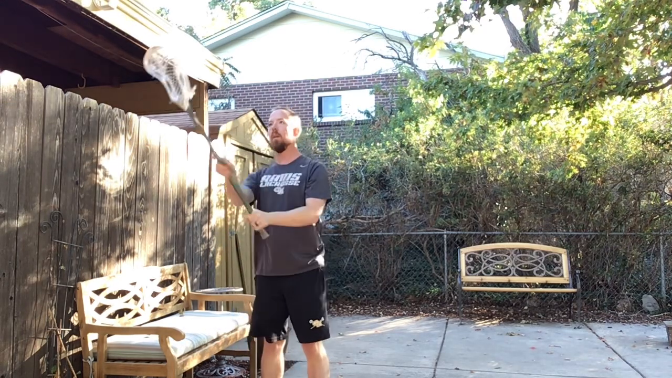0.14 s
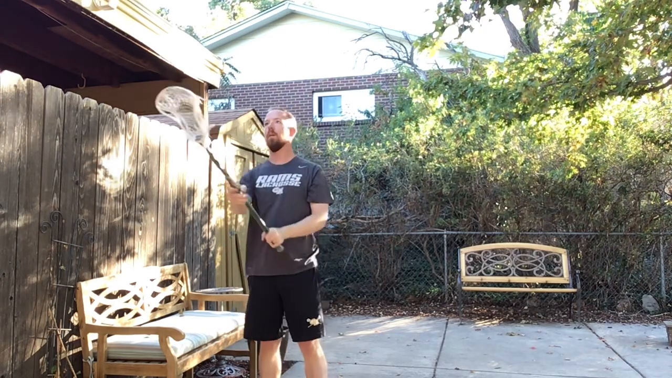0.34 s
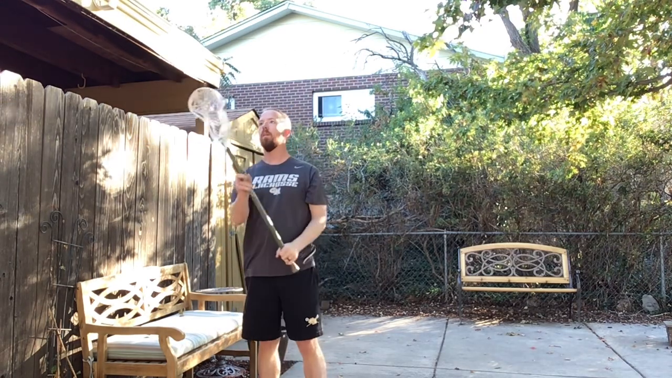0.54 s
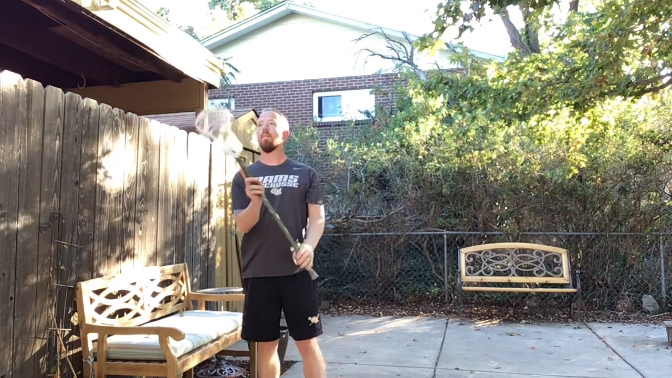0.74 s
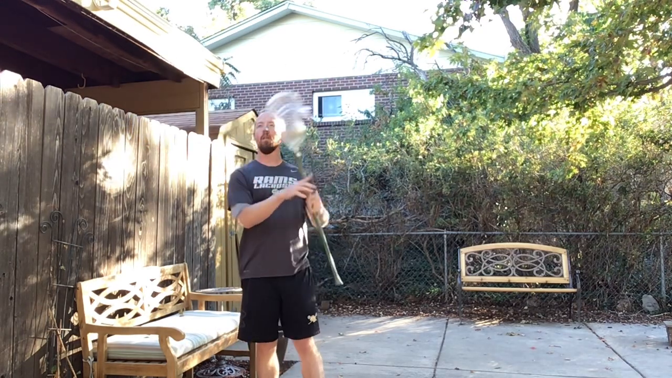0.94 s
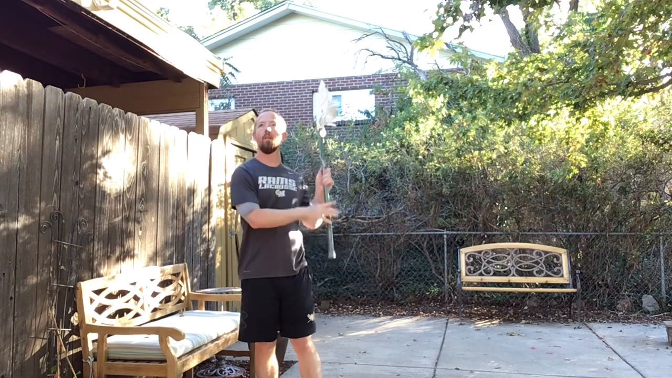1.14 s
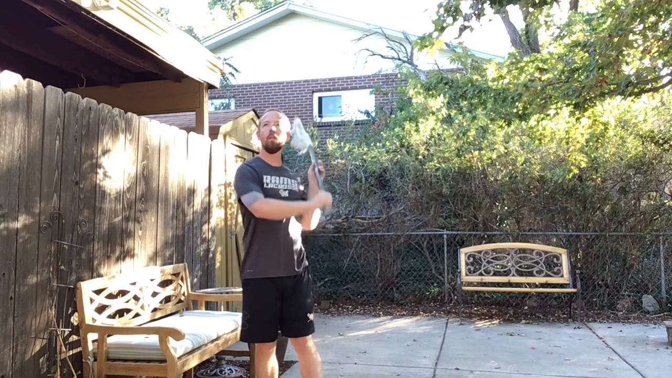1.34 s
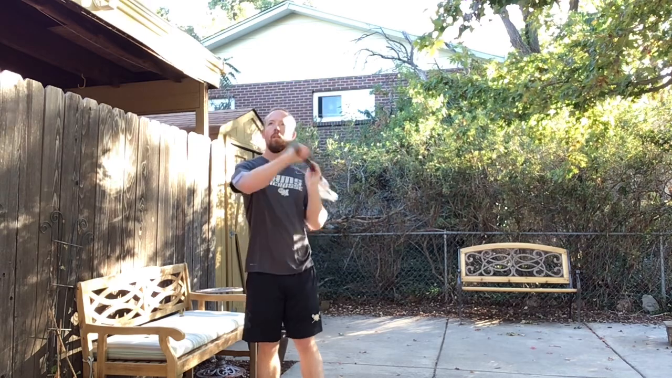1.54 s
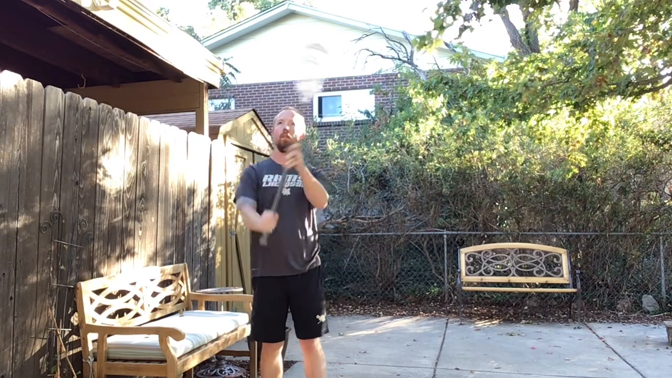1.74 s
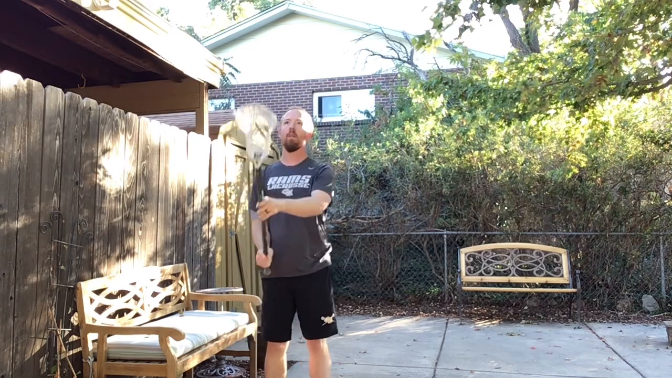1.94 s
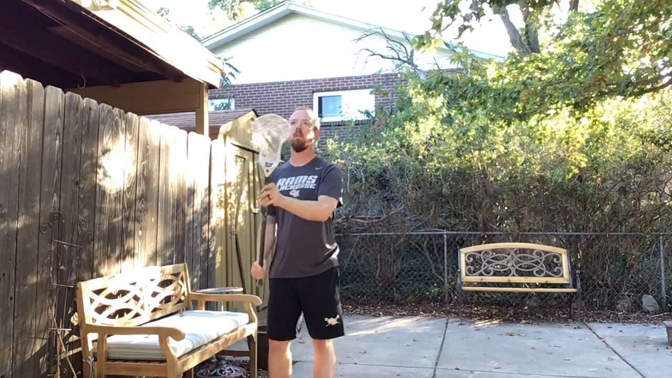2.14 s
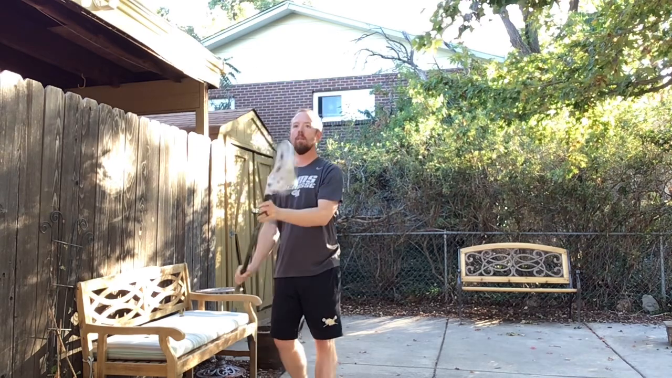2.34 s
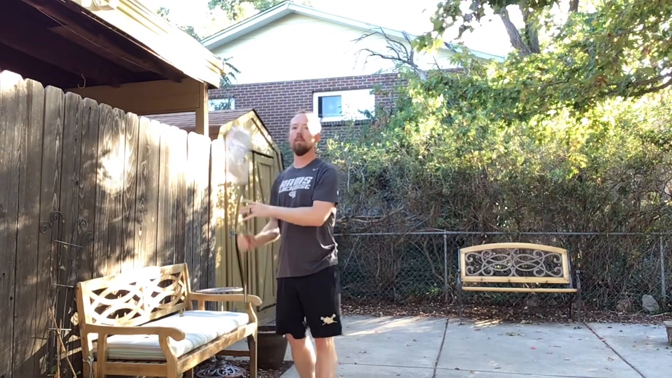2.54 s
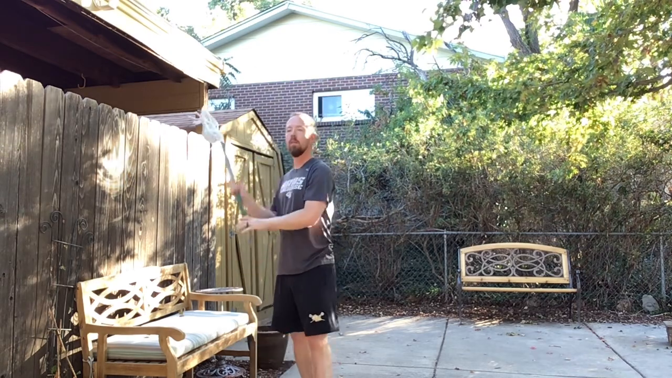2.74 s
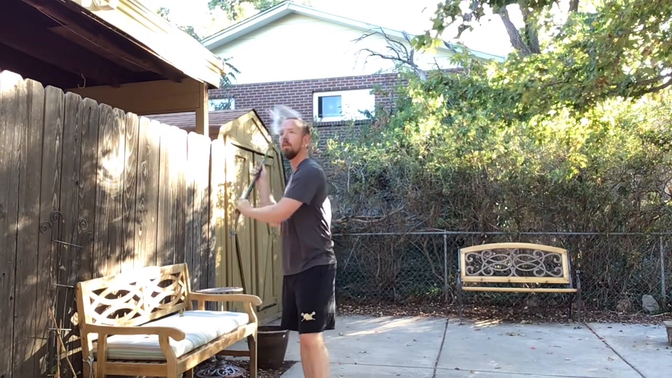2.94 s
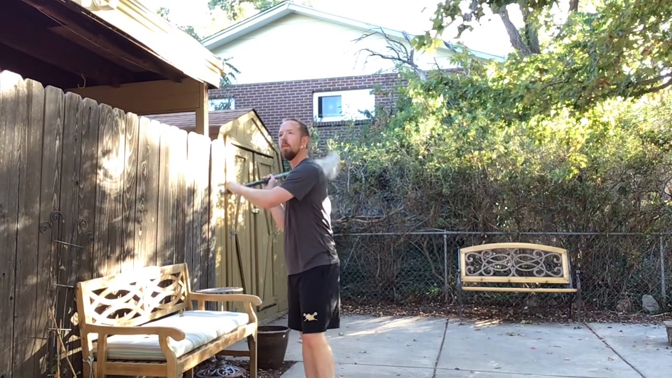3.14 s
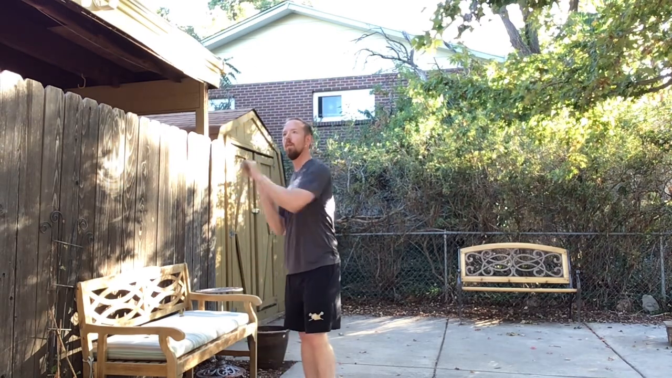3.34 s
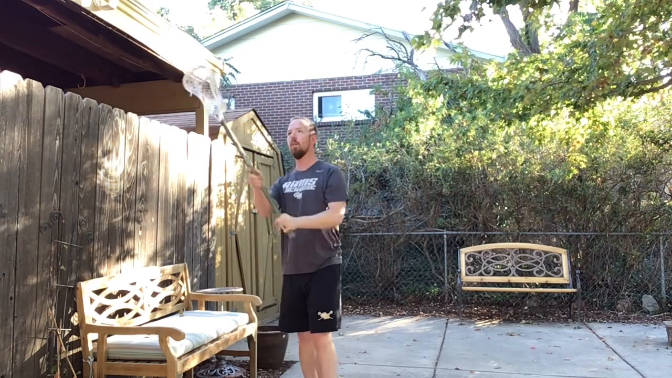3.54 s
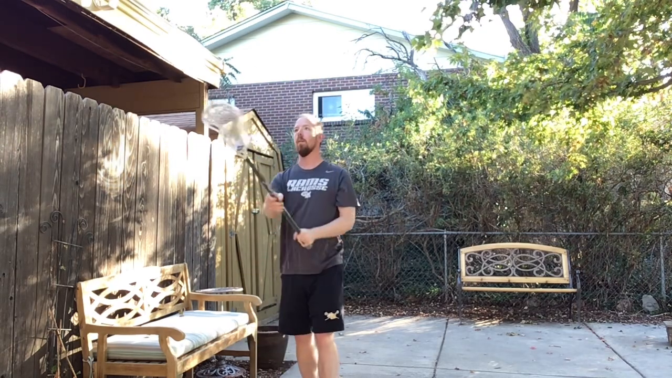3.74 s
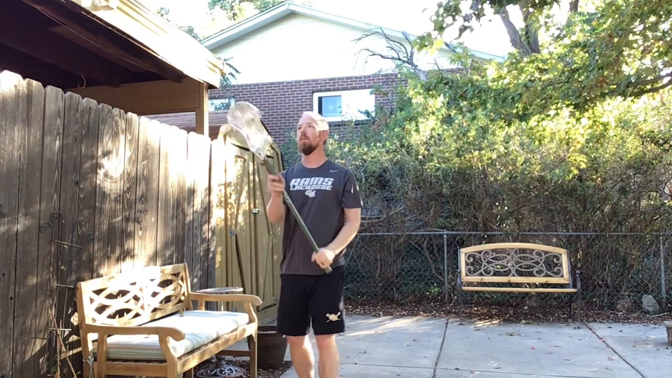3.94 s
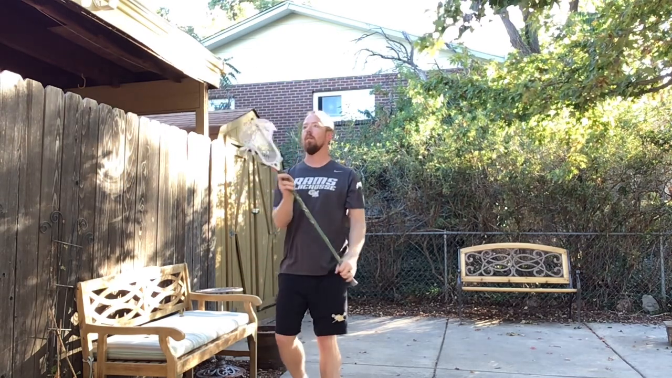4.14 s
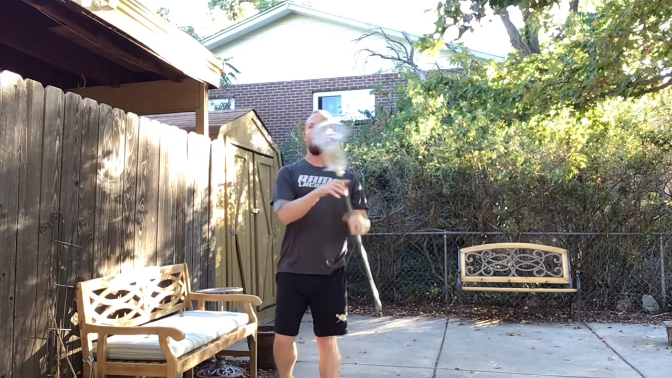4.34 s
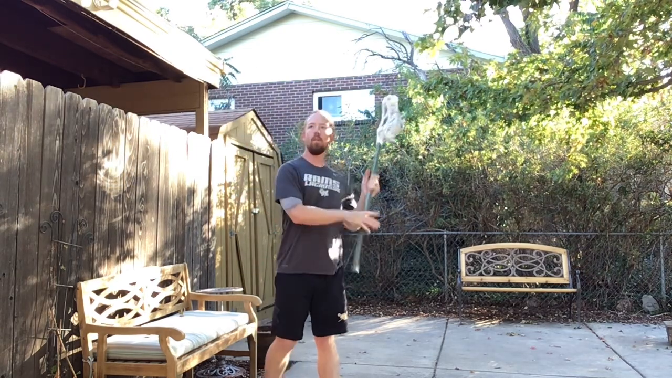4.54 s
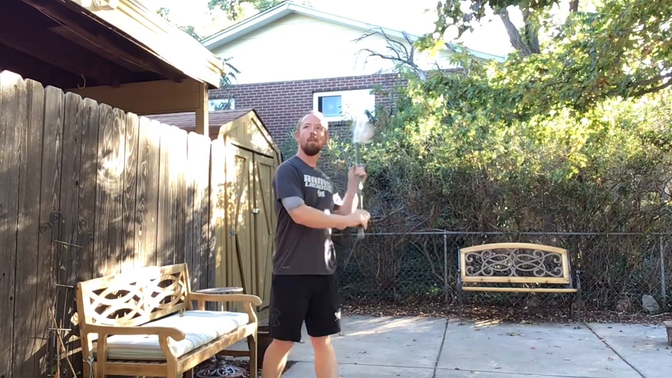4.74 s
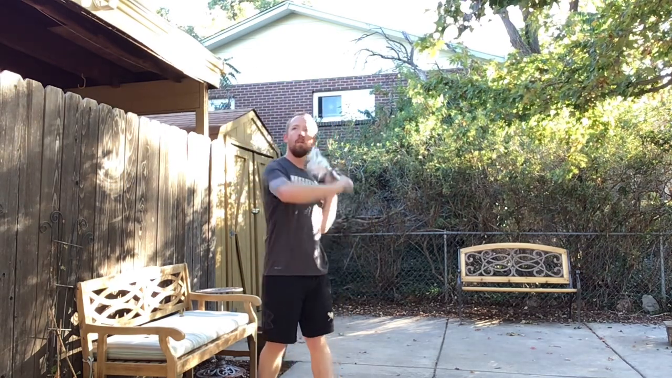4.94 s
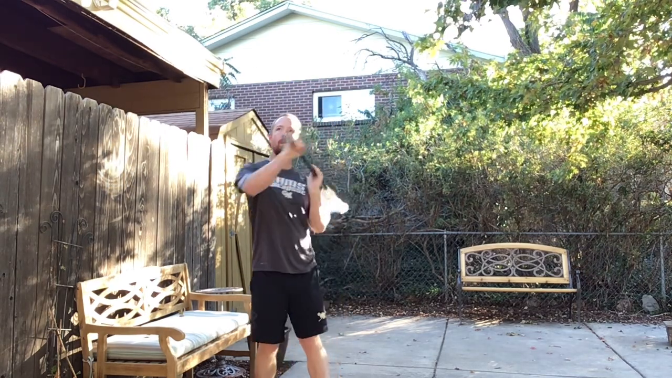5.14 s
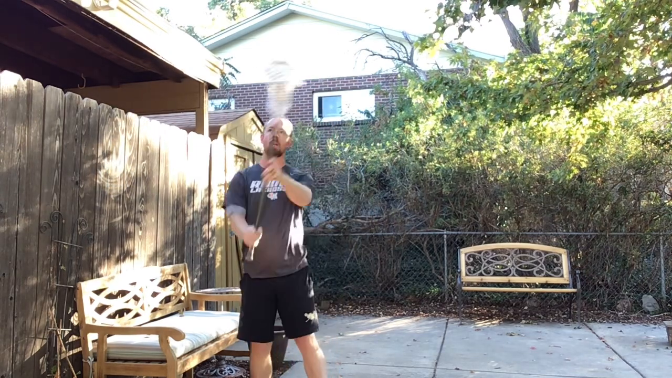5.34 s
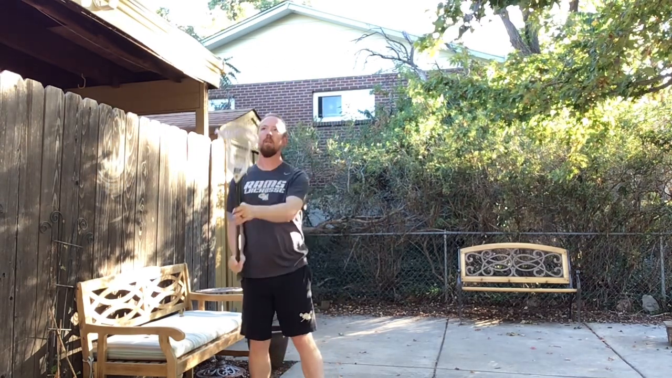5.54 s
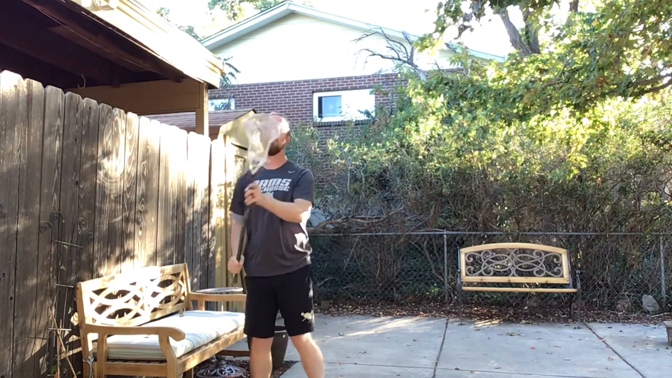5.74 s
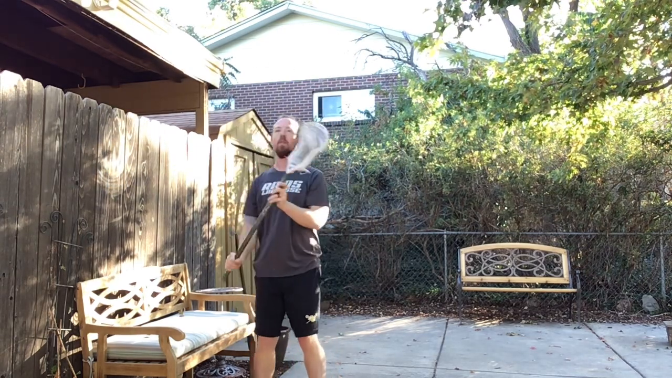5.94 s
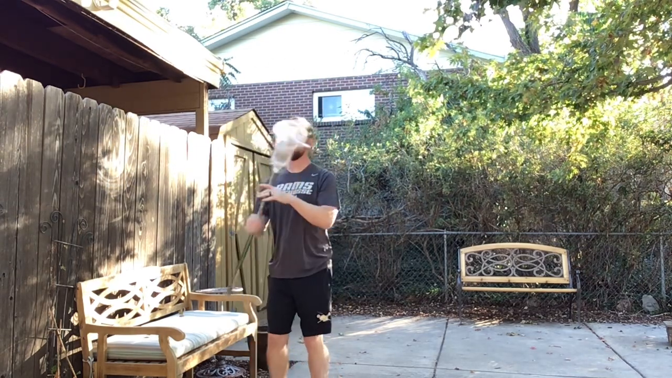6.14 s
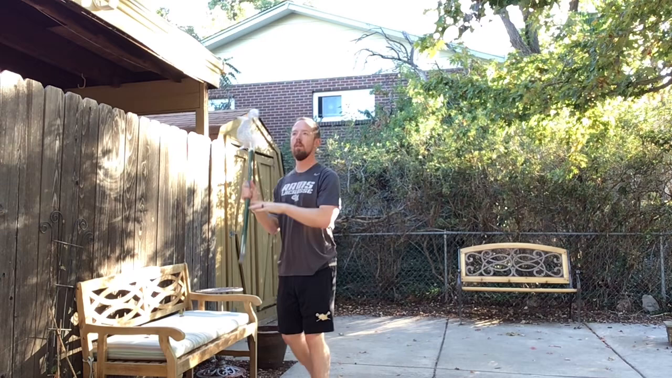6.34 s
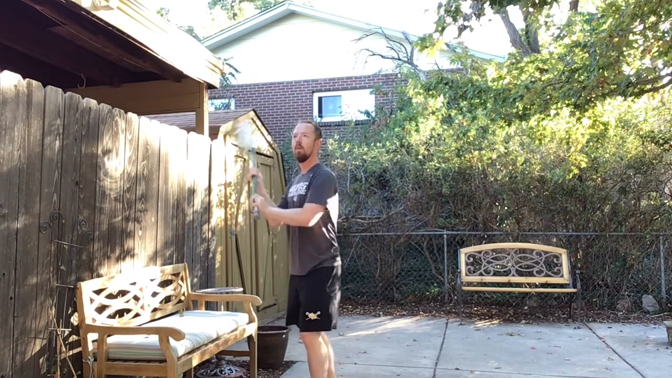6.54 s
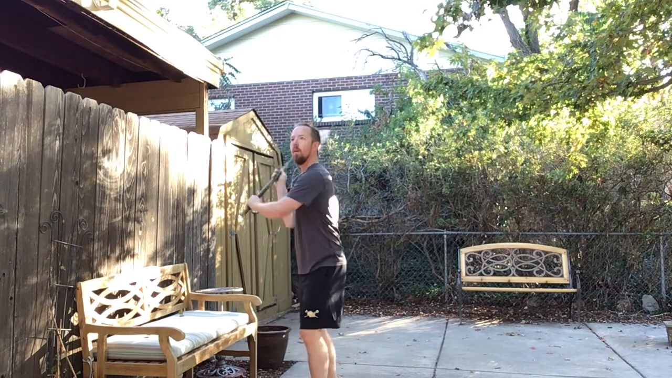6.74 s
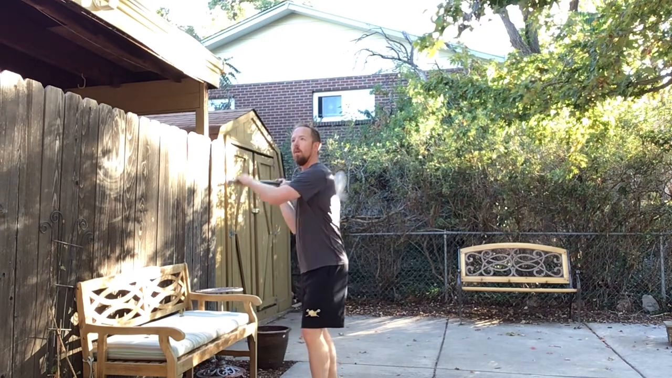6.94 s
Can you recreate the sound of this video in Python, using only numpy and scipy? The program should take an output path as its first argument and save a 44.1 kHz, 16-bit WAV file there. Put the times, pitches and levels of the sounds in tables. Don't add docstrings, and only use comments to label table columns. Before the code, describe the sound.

A fenced patio with hard slab and walls, heard from a few steps away. A low town hum and a distant propeller drone, wavering and sinking slightly in pitch, run throughout. At 0.4 s a rubber ball hits a sprung net: bright slap, low thump, quick reflections and a short low tail. At 0.74 s it crunches softly into a mesh pocket, with light grip contacts around 1.0 and 1.4 s. A second hit at 2.0 s has a slightly different thump, its catch at 2.36 s the clearest. The third hit comes at 3.8 s, caught at 4.2 s, with a small contact at 4.5 s. The fourth hits at 5.6 s, caught at 5.98 s, as a faint far bird twitters falling notes until 6.2 s. From 6.55 to 6.75 s a shoe scrapes and crackles on grit; then only the drone and hum remain.

```python
import sys
import numpy as np
from scipy import signal
from scipy.fft import rfft, irfft
from scipy.io import wavfile

SR = 44100
rng = np.random.default_rng(int(sys.argv[2]) if len(sys.argv) > 2 else 0)


def unload_wav(signal):
    wavfile.write(
        sys.argv[1],
        SR,
        np.round(np.clip(np.atleast_2d(signal).T, -1, 1) * 32767).astype(np.int16),
    )


def linear_from_db(decibels):
    return 10 ** (np.asarray(decibels, float) / 20)


N = 313110

# (time [s], slap peak [dB], thump level [dB], thump lag [ms], shiver of the cords [Hz])
NET_HITS = [
    (.387, -29.5, -22.5, 4.6, 7300),
    (2.0367, -28, -19, 4.3, 9600),
    (3.8243, -26, -21.5, 5.0, 10100),
    (5.6176, -28.5, -18, 2.63, 9600),
]


def rms_one(x):
    return x / np.sqrt(np.mean(x ** 2) + 1e-20)


def at_hz(points, hz, column=1):
    points = np.array(points)
    return np.interp(np.log(hz), np.log(points[:, 0]), points[:, column])


def drift(rate):
    pole = np.exp(-80 * np.pi * rate / SR)
    noise = rng.standard_normal(N // 40 + 2002)
    slow = signal.lfilter([1], [1, -2 * pole, pole * pole], noise)[2000:]
    return np.interp(np.arange(N) / 40, np.arange(len(slow)), rms_one(slow))


def ring(clicks, hz, t60):
    radius = linear_from_db(-60 / (t60 * SR))
    angle = 2 * np.pi * hz / SR
    poles = [1, -2 * radius * np.cos(angle), radius * radius]
    return signal.lfilter([0, np.sin(angle)], poles, clicks + 1e-18)


def colour(x, spectrum):
    size = 8192
    hz = np.maximum(np.arange(size // 2 + 1) * SR / size, 1)
    cepstrum = irfft(np.log(linear_from_db(at_hz(spectrum, hz))))
    cepstrum[1:size // 2] *= 2
    cepstrum[size // 2 + 1:] = 0
    impulse = irfft(np.exp(rfft(cepstrum)))
    return signal.fftconvolve(x, impulse)[:len(x)]


def dying(t60, rise_s, size):
    t = np.arange(size) / SR
    return (1 - np.exp(-t / rise_s)) * linear_from_db(-60 * t / t60)


def pressed(press_s, t60, size):
    t = np.arange(size) / SR
    released_db = -60 * np.maximum(t - press_s, 0) / t60 - 5.0 * (t > press_s)
    return (1 - np.exp(-t / 0.00043)) * linear_from_db(released_db)


def grains(size, per_s, spread_db):
    sizes = linear_from_db(spread_db * np.minimum(rng.exponential(1, size), 4)) * rng.standard_normal(size)
    return rms_one(sizes * (rng.random(size) < per_s / SR))


def add(track, s, sound):
    i = round(s * SR)
    track[i:i + len(sound)] += sound[:N - i]


def slap():
    # (delay [ms], level [dB])
    echoes = [(0, 0), (1.8, -8), (3.4, -8), (5.6, -12), (8.5, -14)]
    # (frequency [Hz], left [dB per Hz], right [dB per Hz])
    slap_colour = [(402, 24, 11), (1000, -1, -17.5), (1780, 3, -7), (2700, 4.5, 2), (3880, 2, -4),
                   (5500, 4, -5), (7060, 7, -3.5), (10900, 5.5, 3.5), (13500, 1.5, -1), (16100, -3, 4)]
    # (frequency [Hz], level against the thump [dB], t60 [s])
    steel_frame = [(520, -28, 0.083), (627, -37, 0.24), (750, -29, 0.019)]
    tail_db, tail_t60_s, frame_lag_s = -54.5, 0.2, 0.00174
    out, size = np.zeros(N), SR // 3
    for turn, (s, peak_db, thump_db, _, shiver_hz) in enumerate(NET_HITS):
        sound = linear_from_db(tail_db) * grains(size, 20000, spread_db=-1.5) * dying(tail_t60_s, 0.0012, size)
        for ms, level_db in echoes:
            click = rng.standard_normal(size=90) * dying(.0018, .0001, size=90)
            click = signal.lfilter([1, -.7 * (ms > 1)], [1], click)
            add(sound, ms / 1000, linear_from_db(peak_db + level_db) * click / np.abs(click).max())
        sound += 0.05 * ring(sound, shiver_hz, 0.003)
        add(out, s, colour(sound, np.array(slap_colour)[:, [0, 1 + turn % 2]]))
        for hz, level_db, t60 in steel_frame:
            clank_db = thump_db + level_db + rng.normal(0, 1)
            add(out, s + frame_lag_s, linear_from_db(clank_db) * ring(np.arange(size) == 0, hz, t60))
    return linear_from_db(2.0) * out


def thump():
    # (frequency [Hz], level [dB], t60 [s])
    left_modes = [(155.8, 4, 0.11), (210.9, 10, 0.023), (210, 0.6, .12), (267, 1.4, 0.1), (327, 0.7, 0.052),
                  (404, -16, .05)]
    # (frequency [Hz], level [dB], t60 [s])
    right_modes = [(144.4, -7, 0.105), (174.2, -3, .12), (199.4, 0.4, 0.052), (241.3, -1, 0.061),
                   (321.6, -6, 0.1), (378.4, -11, 0.088)]
    # (extra path [m], left hit [dB], right hit [dB])
    walls = [
        (0, 0, 0),
        (3.07, -6, -3.7),
        (7.83, -30, 0),
        (10.72, -14.5, -29),
        (20.69, -11.5, -9.5),
        (27.56, -30, -14),
        (30.57, -19, -30),
    ]
    contact_s = (.0019, .0028)
    sound_m_per_s = 343
    out, size = np.zeros(N), SR // 3
    for turn, (s, _, level_db, lag_ms, _) in enumerate(NET_HITS):
        side = turn % 2
        push = np.hanning(round(contact_s[side] * SR))
        push = np.pad(push / push.sum(), (0, size))
        swing = np.zeros(len(push))
        for k, (hz, db, t60) in enumerate((left_modes, right_modes)[side]):
            swing += (-1) ** k * linear_from_db(db) * ring(push, hz, t60)
        for path_m, *loss_db in walls:
            arrival_s = s + lag_ms / 1000 + path_m / sound_m_per_s
            add(out, arrival_s, linear_from_db(level_db + loss_db[side]) * swing)
    return out


def yard():
    # (frequency [Hz], level [dB per Hz], t60 [s])
    reverberation = [(60.6, -42, 0.61), (122, -32.5, 0.18), (214, -48, 0.69), (287, -55, 0.48),
                     (400, -53, 0.34), (620, -58, 0.24), (900, -67.5, 0.23), (1500, -64.5, 0.063)]
    out, size = np.zeros(N), SR
    edges = 45 * 2 ** np.arange(0, 5.6, .5)
    for s, _, level_db, *_ in NET_HITS:
        for low, high in zip(edges, edges[1:]):
            hz = np.sqrt(low * high)
            sos = signal.butter(2, [low, high], "band", fs=SR, output="sos")
            band = signal.sosfilt(sos, rng.standard_normal(size))
            tail = band * dying(at_hz(reverberation, hz, column=2), 11.0 / hz, size)
            add(out, s, linear_from_db(level_db + at_hz(reverberation, hz) + 49.5) * tail)
    return out


def catches():
    # (time [s], level [dB], press [s], t60 [s], ring of the head [Hz])
    drops = [
        (0.742, -57.5, 0.015, 0.25, 2240),
        (2.355, -48.5, 0.0087, 0.073, 3030),
        (2.371, -57, 0.02, 0.2, 2700),
        (4.175, -57, 0.0106, 0.11, 3220),
        (5.979, -59, 0.0053, 0.33, 7500),
    ]
    # (frequency [Hz], level [dB per Hz])
    pocket = [(200, 5.5), (500, 4), (1000, -2), (1800, -5.5), (2700, -1.5), (3800, -1.5), (5500, -7),
              (7700, -7), (10500, -12.5), (15000, -19)]
    out, size = np.zeros(N), SR // 4
    for s, level_db, press_s, t60, head_hz in drops:
        crunch = rms_one(colour(grains(size, 15000, spread_db=4.0), pocket)) * pressed(press_s, t60, size)
        head = 75 / head_hz * ring(crunch, head_hz, .02)
        add(out, s, linear_from_db(level_db) * (crunch + head))
    return out


def grips():
    # (time [s], level [dB], low edge [Hz], slope above it [dB per octave], t60 [s])
    contacts = [(.743, -57.5, 1500, -11, 0.067), (4.179, -57.5, 1000, -13.5, .07),
                (1.007, -55.5, 2700, -4.5, 0.084), (1.031, -58, 2010, -7, 0.12),
                (1.031, -56.5, 5500, -15, 0.11), (1.411, -56.5, 2700, -3, 0.14),
                (2.669, -69.5, 3000, -2, 0.33), (2.773, -70, 2800, -4, .08), (4.501, -57, 2420, -4, 0.035),
                (4.510, -59.5, 2520, -1, 0.12), (5.319, -58.5, 3020, -10, 0.089),
                (5.6172, -41, 8000, 5, .004), (6.013, -59.5, 4150, -8, 0.086),
                (6.08, -63.5, 3500, -8, 0.073), (6.093, -64.5, 4240, -11, 0.22),
                (6.35, -68.5, 7500, -7, 0.49)]
    press_share = 0.065
    out, size = np.zeros(N), SR // 4
    for s, level_db, edge_hz, slope_db, t60 in contacts:
        shape = [(edge_hz / 1.4, -30), (edge_hz, 0), (edge_hz * 8, 3 * slope_db)]
        contact = rms_one(colour(grains(size, 20000, spread_db=-5.0), shape))
        add(out, s, linear_from_db(level_db) * contact * pressed(press_share * t60, t60, size))
    return out


def grit():
    # (time [s], peak [dB], centre [Hz])
    cracks = [(6.5572, -46, 6700), (6.5722, -43, 6800), (6.592, -45, 3500), (6.605, -42, 4200),
              (6.6222, -37, 9500), (6.638, -47, 4000), (6.6735, -51, 4000), (6.682, -50, 12000),
              (6.704, -44, 9500), (6.710, -45, 10000), (6.743, -51, 7800)]
    out = np.zeros(N)
    for s, peak_db, hz in cracks:
        click = rng.standard_normal(size=200) * dying(0.00051, .00003, size=200)
        crack = click + .5 * ring(click, hz, 0.002)
        add(out, s, linear_from_db(peak_db + 2.0) * crack / np.abs(crack).max())
    return signal.sosfilt(signal.butter(2, 2200, "high", fs=SR, output="sos"), out)


def rustle(strokes, spectrum, per_s, spread_db):
    t, gain = np.arange(N) / SR, np.zeros(N)
    for s, level_db, rise_s, hold_s, fall_s in strokes:
        away = np.maximum(np.maximum((s - t) / rise_s, (t - s - hold_s) / fall_s), 0)
        gain += linear_from_db(level_db - 15 * away)
    clicks = grains(N, per_s, spread_db)
    pitch = rng.integers(0, 12, N)
    rings = np.zeros(N)
    for k, hz in enumerate(np.geomspace(1800, 16000, 12)):
        rings += ring(clicks * (pitch == k), hz, 6.0 / hz) * np.sqrt(hz)
    return gain * rms_one(colour(rings, spectrum) * linear_from_db(0.94 * drift(60)))


def scuffs():
    # (time at full [s], level [dB], rise [s], hold [s], fall [s])
    slides = [
        (3.1, -71.5, .07, .03, .04),
        (6.45, -74, .06, 0.018, 0.058),
        (6.558, -63.5, 0.006, 0.019, .02),
        (6.6, -54, 0.04, 0.026, 0.053),
        (6.706, -67, 0.0079, 0.031, 0.056),
    ]
    # (frequency [Hz], level [dB per Hz])
    sole_colour = [(900, -57), (1600, -21), (2300, -15), (3500, -12), (6000, -7.5), (9000, -6.5),
                   (12000, -11), (16000, -11)]
    return rustle(slides, sole_colour, 10000, spread_db=2.6)


def mesh():
    # (time at full [s], level [dB], rise [s], hold [s], fall [s])
    creeps = [(.5, -80, .01, .01, .09), (.8, -77, .02, .15, .04), (1.19, -78, .05, .01, .04),
              (2.39, -67.5, .02, 0.032, 0.046), (2.5, -75, .05, .03, .07), (3.93, -84, .005, .01, .06),
              (4.02, -74, .05, .01, .05), (4.2, -76, .005, .005, .04), (4.3, -76.5, .1, .1, .04),
              (6.05, -73, .03, .05, .16)]
    # (frequency [Hz], level [dB per Hz])
    cord_colour = [(3000, -25), (6000, -10), (9000, -3), (13500, -1), (16000, 1)]
    return rustle(creeps, cord_colour, 30000, spread_db=.5)


def bird():
    # (time [s], length [s], start [Hz], end [Hz], level [dB])
    whistles = [
        (5.995, .04, 3120, 2760, -72),
        (6.022, .04, 3520, 3300, -73.5),
        (6.075, .075, 3230, 2950, -72.5),
        (6.15, .04, 3200, 2950, -77),
    ]
    out = np.zeros(N)
    for s, length, start_hz, end_hz, level_db in whistles:
        size = round(length * SR)
        phase = 2 * np.pi * np.cumsum(np.linspace(start_hz, end_hz, size)) / SR
        add(out, s, linear_from_db(level_db) * np.hanning(size) ** 0.13 * np.sin(phase))
    return out * linear_from_db(3 * drift(60) - 1.5)


def propeller():
    # (time [s], level [dB])
    carried = [(0, -70.5), (1.1, -66), (1.6, -73.5), (2.4, -73.5), (2.85, -65.5), (3.0, -70), (3.15, -63),
               (3.6, -57), (4.15, -59), (4.5, -67), (4.9, -66), (5.4, -65), (5.9, -61), (6.45, -64),
               (6.62, -70.5), (6.75, -58), (7.1, -57)]
    # (multiple of the blade tone, level against it [dB])
    orders = [(.5, -12), (1.5, -10), (3, -19)]
    blade_hz, sink_hz_per_s = 113.8, .51
    t = np.arange(N) / SR
    octave_db = np.interp(t, *np.transpose(carried))
    blade_db = -60.5 + 0.42 * (octave_db - octave_db.mean())
    turn = 2 * np.pi * np.cumsum(blade_hz - sink_hz_per_s * t) / SR
    out = linear_from_db(octave_db + 5.5 + 0.67 * drift(1.4)) * np.sin(2 * turn + 0.3 * drift(0.52))
    out += linear_from_db(blade_db + 3.0 + 4.4 * drift(21)) * np.sin(turn + 0.49 * drift(1.1))
    for multiple, level_db in orders:
        shaken = linear_from_db(blade_db + level_db + 2.96 * drift(2.5))
        out += shaken * np.sin(multiple * turn + 0.97 * drift(3.8))
    return out


def town():
    # (frequency [Hz], level [dB per Hz])
    hum_colour = [(30, -43.5), (48, -8), (64, -1.5), (115, -1.5), (190, -7.5), (260, -13.5), (450, -16.5),
                  (620, -18.5), (800, -18), (1400, -25.5), (1900, -30), (5000, -34.5), (15000, -45),
                  (16000, -68)]
    hum = rms_one(colour(rng.standard_normal(N + SR), hum_colour)[SR:])
    return linear_from_db(-58 + 0.22 * drift(1.5)) * hum


def scene():
    hits = slap() + thump() + yard()
    handling = catches() + grips() + mesh()
    shoes = grit() + scuffs()
    distance = bird() + propeller() + town()
    return (hits + handling + shoes + distance)[None]


def low_pass(x):
    return signal.sosfilt(signal.butter(12, 16660, fs=SR, output="sos"), x)


def record(dry):
    heard = signal.sosfilt(signal.butter(6, 45, "high", fs=SR, output="sos"), dry)
    heard = signal.sosfilt(signal.cheby2(10, 60, 16900, fs=SR, output="sos"), heard)
    return low_pass(heard)


dry = scene()
out = record(dry)
unload_wav(out)
```